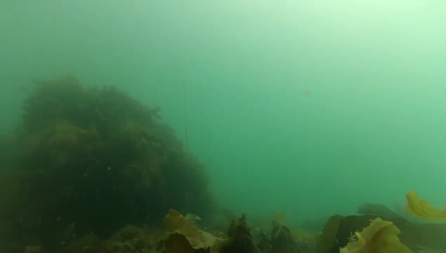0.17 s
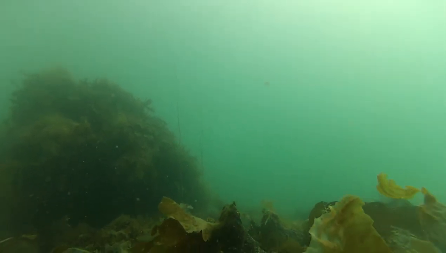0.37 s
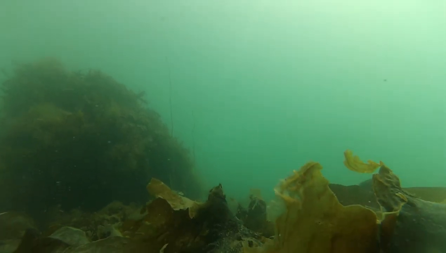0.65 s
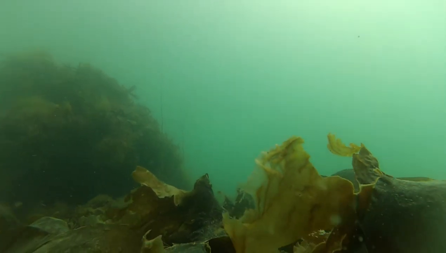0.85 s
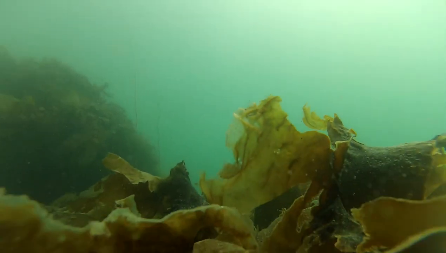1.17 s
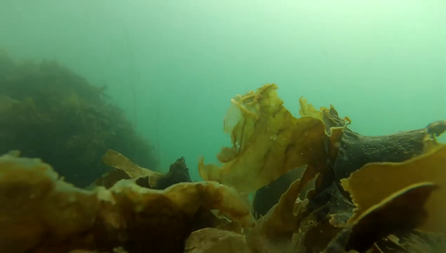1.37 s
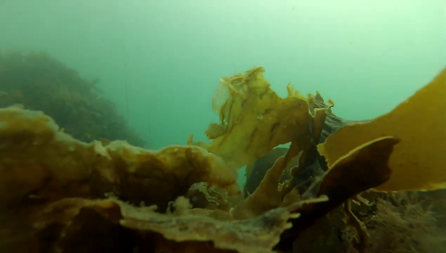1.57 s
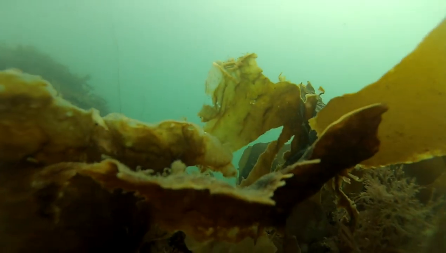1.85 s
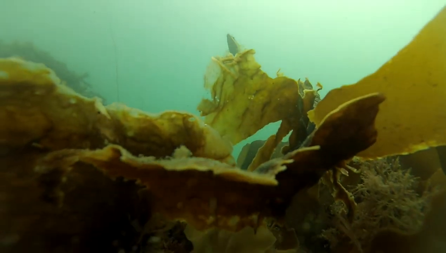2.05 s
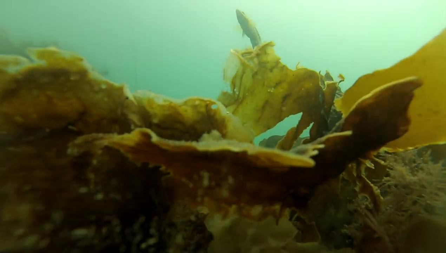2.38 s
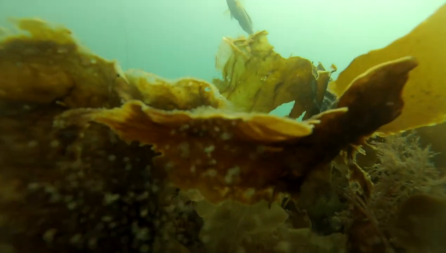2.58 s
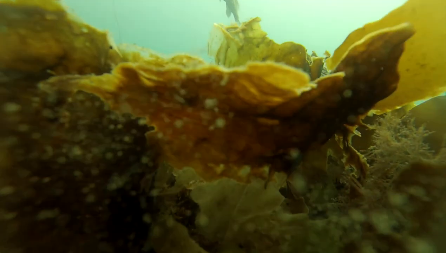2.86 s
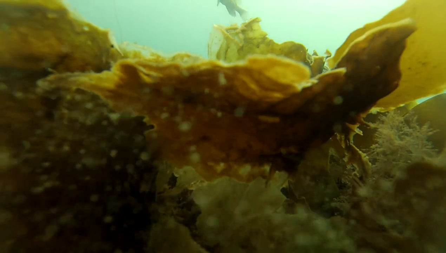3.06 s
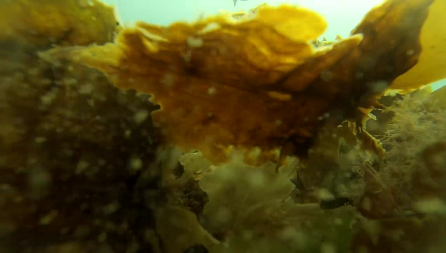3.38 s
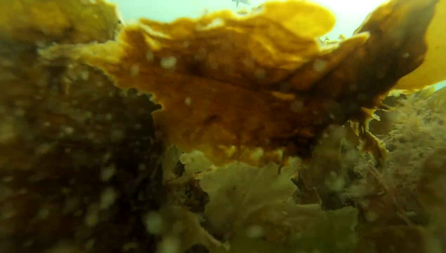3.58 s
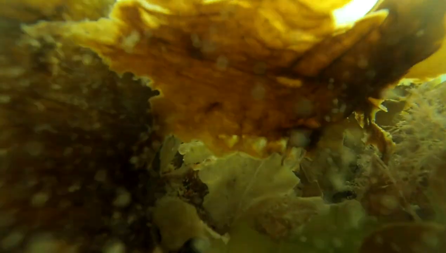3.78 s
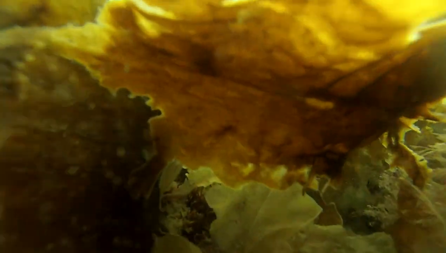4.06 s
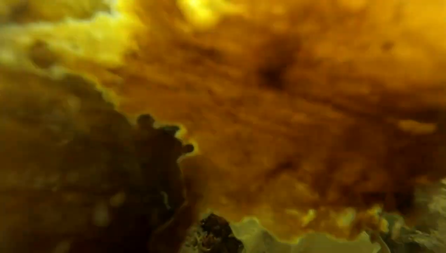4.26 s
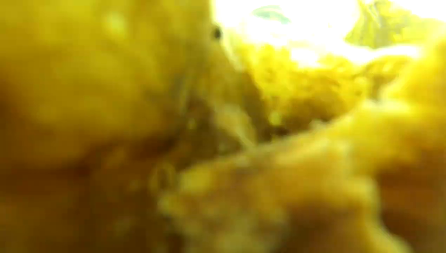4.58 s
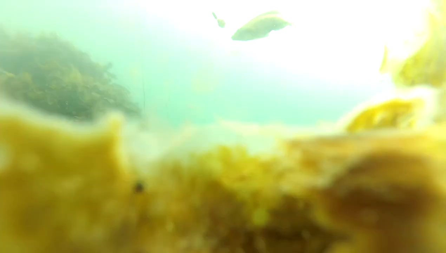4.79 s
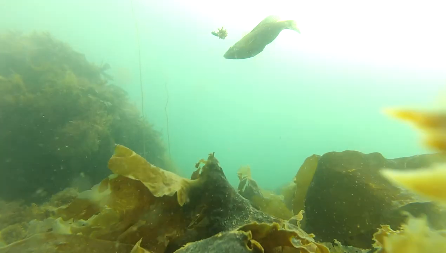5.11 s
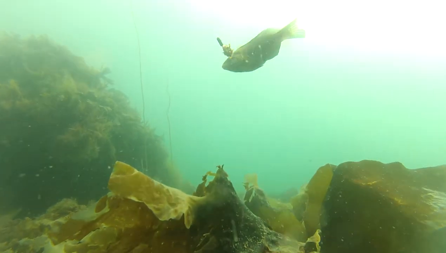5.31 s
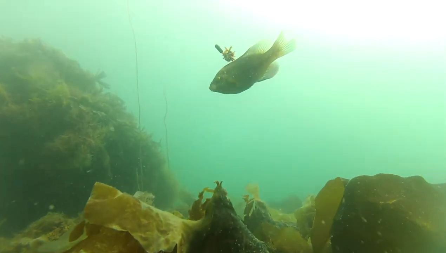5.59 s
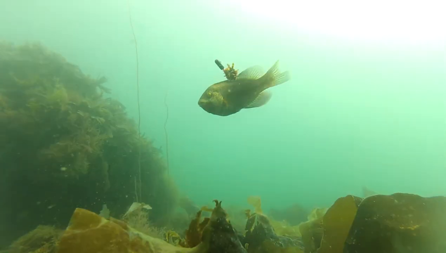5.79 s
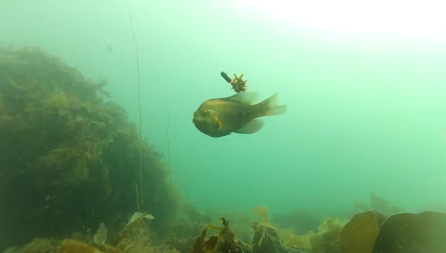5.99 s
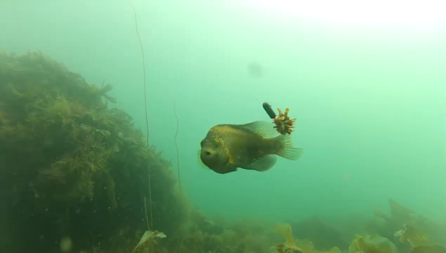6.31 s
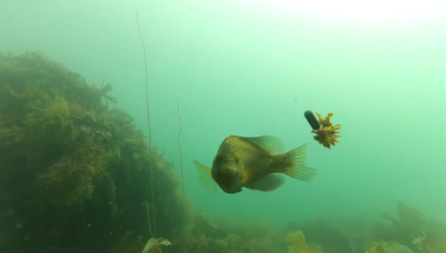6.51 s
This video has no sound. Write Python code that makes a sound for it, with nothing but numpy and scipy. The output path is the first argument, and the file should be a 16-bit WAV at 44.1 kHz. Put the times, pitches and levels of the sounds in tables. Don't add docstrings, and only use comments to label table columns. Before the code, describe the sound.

A microphone enclosed in a small submerged shell picks up boxy, muffled contact noise. Surging water makes the mount wobble and boom over soft hiss. Seaweed slides across with dull knocks and sparse ticks, then several strong thumps land close together. A pressed frond squeaks, rising slightly in pitch. Quick brushing sweeps and crisp snaps crowd the later part, then it settles until a final resonant tap.

```python
import sys
import numpy as np
from scipy import signal
from scipy.fft import rfft, irfft
from scipy.io import wavfile

SR = 44100
rng = np.random.default_rng(int(sys.argv[2]) if len(sys.argv) > 2 else 0)


def wav_out(sig):
    wavfile.write(sys.argv[1], SR, np.round(np.clip(np.atleast_2d(sig).T, -1, 1) * 32767).astype(np.int16))


def volts(x):
    e = np.asarray(x, float) / 20
    return 10 ** e


N = 293265

# frequency in Hz, level in dB per Hz.
WATER_COLOUR = [(88, -48), (150, -12), (252, -13.5), (312, -17.5), (536, -11.5), (702, -12.5), (937, -31.5),
                (1110, -13), (1330, -33), (1740, -17.5), (2760, -40), (3540, -36.5), (4470, -38),
                (10800, -40.5), (15000, -46.5)]
WATER_DB = -49
# frequency in Hz, level in dB.
WHINE_TONE = (11080, -92)

# time in seconds, level in dB.
SURGE_STRENGTH = [(0.0, -34), (0.16, -33), (0.3, -31), (0.6, -34), (1.05, -36), (1.3, -29), (1.6, -37),
                  (2.05, -39), (2.6, -38), (3.06, -42), (3.75, -42), (4.2, -31), (4.55, -33), (5.1, -45),
                  (5.25, -29), (5.87, -27), (6.06, -35), (6.65, -46)]
# start in seconds, length in seconds, push in dB, wobble in dB.
LURCHES = [(0, 0.18, -33, -25), (0.723, 0.098, -26.5, -43), (1.078, 0.11, -31, -36),
           (1.148, 0.44, -41, -28.5), (1.587, 0.47, -41, -37), (1.995, .15, -35.5, -32),
           (2.17, 0.2, -36.5, -36.5), (2.795, 0.29, -32, -48), (3.15, 0.45, -36.5, -38.5),
           (3.358, 0.25, -31.5, -32), (3.87, 0.088, -29.5, -47), (3.933, 0.11, -41, -40.5),
           (4.323, 0.16, -24, -44), (4.457, 0.21, -36, -35), (4.617, 0.15, -34, -32.5),
           (4.78, 0.15, -28.5, -50), (4.87, 0.19, -30.5, -58), (5.073, 0.088, -33, -50),
           (5.143, 0.36, -45, -39), (5.904, 0.27, -53, -49)]
WOBBLE_DB, WOBBLE_FOLLOWS, CALM_DB = -41.5, 0.16, -38

# time in seconds, pressure in dB, sliding speed in dB.
RESTING_KELP = [(0, -47.5, -56), (.28, -54.5, -61.5), (.53, -55, -57.5), (.75, -47.5, -57),
                (1.13, -48.5, -55.5), (1.39, -52, -58.5), (1.89, -53, -58), (2.43, -56.5, -57.5),
                (2.87, -49.5, -56), (3.07, -59, -58), (3.37, -51.5, -56.5), (3.7, -51, -57.5),
                (4.4, -42.5, -54), (4.72, -55.5, -55), (4.95, -60.5, -55.5), (5.6, -50.5, -55.5),
                (6.1, -60, -61.5), (6.65, -59.5, -61.5)]
# start in seconds, length in seconds, friction in dB,
# weight in dB, brightness in dB.
SWEEPS = [(0.896, 0.58, -61.5, 14.5, -4), (1.06, 0.11, -56.5, 16, -8), (1.403, 0.34, -50, 3.5, 0),
          (2.058, 0.34, -49, -0.5, -5), (3.418, 0.062, -40, 8.5, -6), (3.78, 0.44, -47.5, -4.5, 0),
          (3.872, 0.47, -43, -26, 8.5), (4.124, 0.14, -47.5, -5, 15.5), (4.246, 0.18, -39.5, -3, -8),
          (4.542, 0.035, -45.5, -3, 5), (4.636, 0.051, -42.5, -1, 1), (4.742, 0.17, -46, 2.5, -0.5),
          (5.042, 0.16, -48, -6.5, 0), (5.226, 0.086, -37.5, -1, -1.5), (5.275, 0.21, -40.5, -4, -0.5),
          (5.391, 0.17, -39, 4, -5), (5.603, 0.033, -41.5, -12, 2.5), (5.628, .1, -63, 20.5, -3),
          (5.724, 0.04, -47, -7, 0), (5.805, 0.063, -33.5, -10, -3.5), (5.823, 0.2, -45, -2, -5),
          (6.151, 0.029, -55, 11.5, -7)]
# start in seconds, length in seconds, hiss in dB.
BRUSHES = [
    (0.918, 0.37, -64),
    (3.71, 0.13, -64),
    (4.3, .14, -65),
    (5.044, .16, -70),
    (5.204, 0.044, -53),
    (5.243, 0.083, -58),
    (5.325, 0.08, -55),
    (5.43, .025, -56),
    (5.467, .04, -56),
]
# start in seconds, length in seconds, level in dB.
WISPS = [
    (1.0, .25, -72),
    (4.0, 0.18, -66),
    (4.5, 0.37, -70),
    (5.03, 0.24, -67),
    (5.588, .04, -68),
]
# frequency in Hz, width in Hz, level in dB.
SHELL_DEEP = [(204, 86, -1), (278, 18.2, 2), (370, 75, -7)]
SHELL_LOW = [(525, 56, 3), (664, 97, 3), (830, 138, -2), (1246, 360, -7)]
SHELL_HIGH = [(1384, 240, 4.5), (1695, 314, 4), (2320, 420, 1), (3537, 280, 0), (3945, 310, -4.5)]
SHELL_TOP = [(5060, 680, 4.5), (6300, 770, 0.5), (6990, 550, 0.5)]
SHELL_AIR = [(8980, 1300, -4), (10400, 1400, -0.5), (12900, 2900, -6.5)]
DRAG_DB = 1.5
HISS_DB, HISS_FOLLOWS, SLOW_DB = -72.5, 2.44, -58
AIR_DB, AIR_FOLLOWS = -78.5, 0.78
RUSTLE_UNDER_DB, HISS_UNDER_DB = 9.5, 20
HISS_BRIGHT = 0.9
RISE, FALL = 0.28, 0.37

# start in seconds, length in seconds, frequency in Hz, level in dB.
RUBS = [(0.14, 0.083, 570, -40.5), (0.141, 0.047, 370, -37), (0.488, 0.17, 550, -51.5),
        (0.969, 0.094, 517, -43), (1.202, 0.13, 259, -39), (1.257, 0.087, 656, -48.5),
        (1.187, 0.088, 457, -44.5), (1.77, .05, 10700, -74), (2.167, 0.2, 363, -50), (3.45, 0.03, 700, -35),
        (3.482, .02, 600, -40), (3.507, .02, 700, -39), (3.522, .03, 700, -46), (3.625, .04, 600, -48),
        (4.68, 0.1, 5130, -63), (5.02, 0.12, 5400, -62.5), (5.06, 0.07, 1100, -58), (5.095, .03, 600, -48),
        (4.99, .03, 2100, -58), (1.24, .11, 540, -45), (1.28, .06, 400, -45), (1.21, .03, 2200, -60),
        (5.614, 0.038, 780, -41), (6.075, 0.055, 10800, -74), (3.725, 0.076, 5000, -68),
        (3.725, .07, 6250, -67), (4.386, .012, 6800, -64), (1.473, .06, 270, -42), (1.314, 0.044, 690, -54),
        (1.806, 0.032, 295, -37.5), (3.72, 0.1, 1050, -56.5), (3.964, 0.32, 2380, -57),
        (3.96, 0.3, 3800, -56), (4.12, .12, 3800, -57), (5.21, .035, 8300, -62), (5.25, .045, 8000, -64),
        (5.332, .05, 8800, -65.5), (0.0, 0.036, 285, -35.5), (2.05, 0.38, 1130, -58),
        (2.048, .3, 1670, -61), (5.812, 0.029, 8500, -63), (2.605, .045, 460, -45), (2.18, .04, 640, -47),
        (4.425, .04, 670, -42), (2.52, .12, 165, -44), (1.205, .035, 350, -41)]
# time in seconds, note in Hz, level in dB.
SQUEAK = [
    (3.86, 815, -45),
    (3.934, 807, -36.5),
    (3.952, 830, -42.5),
    (4.22, 859, -30.5),
    (4.248, 840, -61),
    (4.26, 850, -52),
]
# start in seconds, length in seconds, frequency in Hz, level in dB.
HUMS = [
    (6.185, .02, 660, -39),
    (6.172, .014, 620, -48),
]
# time in seconds, peak in dB, frequency in Hz, 60 dB decay in seconds.
PINGS = [(1.618, -31, 1200, .009), (1.618, -38, 2000, .006), (1.618, -45, 3200, .006),
         (2.89, -49, 3500, .01), (2.955, -48, 3500, .01), (3.4332, -30, 2000, .008),
         (3.4334, -33, 2600, .007), (3.4332, -34, 3200, .008), (3.4334, -42, 4300, .007),
         (3.434, -23, 720, .03), (3.478, -25, 720, .03), (3.468, -32, 2250, .012), (3.468, -34, 3400, .007),
         (3.468, -43, 4400, .006), (3.4775, -43, 2600, .008), (3.5037, -40, 2200, .01),
         (3.612, -40, 2200, .015), (3.6165, -31, 1000, .014), (3.6165, -40, 1700, .012),
         (3.7575, -36, 2250, .014), (3.758, -43, 2600, .01), (3.7575, -42, 2950, .014),
         (3.758, -48, 6600, .012), (3.8245, -47, 6500, .006), (3.8245, -52, 5200, .008),
         (5.071, -44, 1000, .02), (5.108, -43, 1150, .02), (6.155, -40, 1550, .015),
         (6.155, -42, 2300, .012), (6.1597, -19, 615, .028), (6.1612, -30, 1220, .024),
         (6.1596, -38, 1550, .011), (4.406, -29, 650, .03), (4.406, -30, 400, .03)]

# time in seconds, peak in dB, level of the top in dB.
TICKS = [(1.1062, -46, -54), (2.6383, -39, -60), (2.7851, -47, -70), (2.954, -47, -73), (3.433, -38, -76),
         (3.4678, -40, -70), (3.5034, -45, -73), (3.7577, -46, -66), (3.824, -54, -68), (4.3474, -37, -52),
         (4.391, -51, -68), (4.4074, -46, -58), (4.561, -38.5, -52), (4.645, -38, -60), (4.672, -39, -54),
         (4.764, -42.5, -68), (5.25, -44, -54), (5.439, -38, -49.5), (5.499, -44, -57), (5.6146, -45, -58),
         (5.7952, -43, -55), (5.8156, -50, -60), (5.8282, -32, -57), (5.837, -35, -63),
         (5.8687, -35.5, -59), (6.155, -44, -69), (6.1602, -47, -55)]
# frequency in Hz, width in Hz, level in dB.
TICK_LOW = [(2180, 380, 0), (3520, 810, -7.5), (4660, 910, -14.5)]
TICK_TOP = [(6500, 1900, 0.5), (10500, 4800, -13)]

# time in seconds, peak in dB, pitch in Hz,
# upper modes in dB.
DAMPED_TAPS = [(1.094, -22.5, 405, -29), (1.403, -27.5, 543, -21), (1.618, -33, 700, -20),
               (1.804, -30, 510, -27), (1.817, -22, 387, -37), (2.167, -33, 520, -10),
               (2.955, -26.5, 627, -30), (3.928, -22, 796, -26), (4.093, -16.5, 795, -19),
               (4.123, -26, 854, -26), (4.342, -36, 670, -20), (4.56, -20, 690, -21),
               (4.644, -26.5, 570, -12.5), (4.808, -28.5, 770, -12), (5.238, -18.5, 560, -19),
               (5.666, -23.5, 630, -27), (5.792, -24.5, 560, -15), (6.1596, -27, 330, -30),
               (6.16, -44, 3800, -25), (3.399, -38, 1040, -15), (3.4675, -24.5, 970, -10),
               (3.6125, -28, 1010, -16), (3.6185, -27, 405, -20), (4.3433, -29.5, 900, -17),
               (5.319, -28, 640, -20), (3.4605, -16, 676, -22), (1.618, -42, 1000, -20),
               (3.7, -38, 700, -12), (2.256, -30, 400, -25)]
# time in seconds, peak in dB, pitch in Hz, upper modes in dB.
BOUNCES = [(1.257, -31.5, 613, -26), (3.4, -33.5, 412, -6), (3.433, -14.5, 474, -21),
           (3.476, -17.5, 498, -17), (3.5053, -20, 410, -20), (3.612, -27.5, 508, -12),
           (4.163, -22.5, 860, -30), (4.388, -23, 418, -17), (4.839, -28.5, 420, -13.5),
           (5.282, -28, 816, -14), (5.35, -34, 630, -24), (5.378, -29.5, 620, -18), (5.422, -22, 558, -26),
           (5.443, -16, 630, -16.5), (5.472, -24, 650, -19), (5.613, -25.5, 577, -9.5),
           (5.694, -35, 624, -26), (5.821, -25, 397, -7)]
# frequency in Hz, level in dB, 60 dB decay in seconds.
TAP_UPPER = [(1120, 4, 0.0079), (1484, -6, 0.026), (2056, -8.5, 0.022)]
TAP_T60_S, BOUNCE_T60_S = 0.013, 0.039

# time in seconds, strength in dB, pitch in Hz, cycles to die.
BLOWS = [(0.089, -14, 80, 4.3), (0.128, -13, 98, 2.2), (0.178, -9.5, 95, 2.3), (1.396, -23, 110, 2),
         (6.162, -22, 85, 2.5), (1.2265, -19, 210, 2), (1.272, -19, 190, 2), (1.249, -22, 170, 2),
         (4.222, -21, 250, 3), (4.269, -22, 250, 3), (1.208, -12.5, 99, 1.6), (1.307, -14, 108, 1.1),
         (1.383, -16, 103, 4.9), (2.174, -7.5, 60, 1.15), (2.242, -13, 195, 0.65), (2.391, -22.5, 207, 2.4),
         (3.401, -22, 250, 14), (3.434, -1.5, 184, 3.2), (3.46, -7, 200, 3.9), (3.478, 0, 227, 2.2),
         (3.505, -6, 258, 2), (3.6135, -6, 253, 0.89), (3.615, -20, 200, 3), (2.187, -24, 125, 8),
         (3.856, -22.5, 129, 6.9), (4.293, -17, 149, 2.5), (4.3205, -10, 125, 3.5), (4.84, -14, 150, 1.3),
         (5.2092, -10.5, 62, 2.4), (5.24, -14.5, 42, 5.9), (5.33, -22, 118, 2.8), (5.524, -14, 62, 1.3),
         (5.616, -8.5, 134, 2.26), (5.665, -14.5, 188, 4.3), (5.701, -33, 98, 1.6)]
# time in seconds, strength in dB, pitch in Hz.
ROCKS = [(0.051, -12, 62), (0.214, -11.5, 56), (0.236, -21, 50), (0.257, -21, 58), (0.294, -15.5, 58),
         (0.345, -22, 58), (0.385, -22, 60), (2.485, -23, 48), (4.84, -14, 52), (5.494, -15.5, 42),
         (5.621, -13.5, 52), (1.121, -16, 53), (4.641, -17.5, 33.2), (4.673, -14, 33.6), (4.763, -17.5, 51),
         (5.289, -11.5, 48), (5.393, -16, 46), (5.657, -14.5, 48.4), (5.813, -15.5, 35.6),
         (5.865, -12.5, 36.3)]
# time in seconds, strength in dB, pitch in Hz.
JOLTS = [(-0.0105, -8, 52), (0.0147, -11.5, 120), (0.031, -14, 52), (0.0405, -18, 120), (0.108, -16, 50),
         (1.106, -21, 108), (1.513, -21, 117), (1.8295, -24, 113), (1.8385, -17, 113), (2.258, -26, 118),
         (2.398, -23, 112), (2.775, -24, 120), (2.907, -21.5, 115), (4.343, -5, 118), (4.425, -14.5, 103.5),
         (4.502, -19.5, 115), (4.947, -20, 48)]
ROCK_CYCLES, JOLT_CYCLES = 4.9, 12.5


def rms_one(x):
    return x / np.sqrt(np.mean(x ** 2) + 1e-20)


def column(rows, k):
    return np.transpose(rows)[k]


def in_time(rows):
    s, *columns = np.transpose(rows)
    return [np.interp(np.arange(N) / SR, s, c) for c in columns]


def add(out, s, wave):
    i = round(s * SR)
    wave = wave[max(-i, 0):N - i]
    out[max(i, 0):max(i, 0) + len(wave)] += wave


def drift(rate):
    r = np.exp(-80 * np.pi * rate / SR)
    noise = rng.standard_normal(N // 40 + 2002)
    slow = signal.lfilter([1], [1, -2 * r, r * r], noise)[2000:]
    return np.interp(np.arange(N) / 40, np.arange(len(slow)), rms_one(slow))


def grains(per_s, spread_db, clump_db):
    sizes = volts(spread_db * np.minimum(rng.exponential(1, N), 5)) * rng.choice([-1, 1], N)
    born = rng.random(N) < per_s * volts(clump_db * drift(18)) / SR
    return rms_one(sizes * born + 1e-9)


def resonances(x, modes):
    out = 0
    for k, (hz, width_hz, db) in enumerate(modes):
        r = np.exp(-np.pi * width_hz / SR)
        poles = [1, -2 * r * np.cos(2 * np.pi * hz / SR), r * r]
        ringing = signal.lfilter([(1 - r * r) / 2, 0, (r * r - 1) / 2], poles, x)
        out = out + (-1) ** k * volts(db) * ringing
    return out


def band(x, low_hz, high_hz):
    return rms_one(signal.sosfilt(signal.butter(3, [low_hz, high_hz], "band", fs=SR, output="sos"), x))


def swells(rows, levels_db, under_db):
    power = volts(2 * under_db)
    for (s, length, *_), db in zip(rows, levels_db):
        u = np.arange(round(length * SR)) / (length * SR)
        shape = np.clip(np.minimum(u / RISE, (1 - u) / FALL), 0, 1)
        add(power, s, volts(2 * db) * shape ** 2)
    return 10 * np.log10(power)


def water():
    hz = np.maximum(np.arange(N // 2 + 1) * SR / N, 1)
    point_hz, point_db = np.transpose(WATER_COLOUR)
    colour = volts(np.interp(np.log(hz), np.log(point_hz), point_db))
    wash = rms_one(irfft(rfft(rng.standard_normal(N)) * colour, N))
    return volts(WATER_DB - 7 + 0.96 * drift(10.0)) * wash


def whine():
    hz, db = WHINE_TONE
    return volts(db + 3 * drift(3)) * np.sin(2 * np.pi * np.cumsum(hz + 15 * drift(30)) / SR)


def surge():
    surge_db, = in_time(SURGE_STRENGTH)
    calm_wobble_db = WOBBLE_DB + WOBBLE_FOLLOWS * (surge_db - CALM_DB)
    push_db = swells(LURCHES, column(LURCHES, 2), surge_db)
    wobble_db = swells(LURCHES, column(LURCHES, 3), calm_wobble_db)
    low = signal.butter(2, [20, 66], "band", fs=SR, output="sos")
    shoves = grains(per_s=290, spread_db=-5.5, clump_db=2.5)
    push = rms_one(signal.sosfilt(low, np.r_[shoves[-SR:], shoves])[SR:])
    mount = [(92.6, 34.0, -0.5), (127.3, 18.7, 1.0), (170.0, 22, -14.5)]  # Hz, width Hz, dB
    wobble = resonances(grains(per_s=120, spread_db=3.0, clump_db=4.0), mount)
    wobble = rms_one(resonances(wobble, [(113.5, 87, 0)]))
    return volts(push_db - 0.5) * push + volts(wobble_db - 3.0) * wobble


def slide():
    pressure_db, speed_db = in_time(RESTING_KELP)
    sweep_db, weight_db, bright_db = (column(SWEEPS, k) for k in (2, 3, 4))
    drag_db = swells(SWEEPS, sweep_db + weight_db, pressure_db + DRAG_DB)
    friction_db = swells(SWEEPS, sweep_db, pressure_db)
    rustle_db = swells(SWEEPS, sweep_db + bright_db - RUSTLE_UNDER_DB, speed_db)
    sweep_hiss_db = sweep_db + HISS_BRIGHT * bright_db - HISS_UNDER_DB
    hiss_db = swells(SWEEPS, sweep_hiss_db, HISS_DB + HISS_FOLLOWS * (speed_db - SLOW_DB))
    air_db = swells(WISPS, column(WISPS, 2), AIR_DB + AIR_FOLLOWS * (hiss_db - HISS_DB))
    hiss_db = swells(BRUSHES, column(BRUSHES, 2), hiss_db)

    slips = grains(per_s=810, spread_db=1.0, clump_db=4.5)
    drag = 1.26 * slips + grains(per_s=240, spread_db=3.5, clump_db=3.5)
    rustle = 0.38 * slips + grains(per_s=5000, spread_db=1.0, clump_db=2.5)
    hiss = 0.72 * rustle + grains(per_s=10000, spread_db=4.0, clump_db=2.5)
    return (volts(drag_db + 1.5) * band(resonances(drag, SHELL_DEEP), 137, 520)
            + volts(friction_db - 1.0) * band(resonances(slips, SHELL_LOW), 406, 1096)
            + volts(rustle_db - 3.5) * band(resonances(rustle, SHELL_HIGH), 1170, 4950)
            + volts(hiss_db - 4.5) * band(resonances(hiss, SHELL_TOP), 3900, 8400)
            + volts(air_db - 6.5) * band(resonances(hiss, SHELL_AIR), 7800, 15000))


def rubs():
    out, slips = np.zeros(N), grains(per_s=2800, spread_db=2.0, clump_db=6.5)
    for s, length, hz, db in RUBS:
        n = round(length * SR)
        mode = [(hz, 30 + 0.12 * hz, 0)]
        caught = resonances(resonances(slips[round(s * SR):][:n], mode), mode)
        add(out, s, volts(db) * np.hanning(n) ** 0.5 * rms_one(caught))
    return out


def squeak():
    note_hz, db = in_time(SQUEAK)
    t = np.arange(N) / SR
    start, end = SQUEAK[0][0], SQUEAK[-1][0]
    pressed = np.clip(np.minimum((t - start) / 0.059, (end - t) / 0.02), 0, 1)
    turn = np.exp(2j * np.pi * np.cumsum(note_hz) / SR)
    r = np.exp(-np.pi * 60 / SR)
    slips = grains(per_s=600, spread_db=3.5, clump_db=1.5) / turn
    note = signal.lfilter([1], [1, -r], signal.lfilter([1], [1, -r ** 3], slips))
    return pressed * volts(db - 2.5) * rms_one(np.real(turn * note))


def hums():
    out = np.zeros(N)
    for s, length, hz, db in HUMS:
        n = round(length * SR)
        add(out, s, volts(db) * np.hanning(n) * np.sin(2 * np.pi * hz * np.arange(n) / SR))
    return out


def pings():
    out, t = np.zeros(N), np.arange(SR // 20) / SR
    for s, db, hz, t60 in PINGS:
        fading = volts(db - 60 * t / max(t60, 0.003))
        onset = 1 - np.exp(-t / 0.0003)
        add(out, s, fading * onset * np.sin(2 * np.pi * hz * t))
    return out


def ticks():
    low, top, t = np.full(N, 1e-18), np.full(N, 1e-18), np.arange(SR // 50) / SR
    for s, db, top_db in TICKS:
        add(low, s, volts(db - 60 * t / 0.015) * rng.standard_normal(len(t)))
        add(top, s, volts(top_db - 60 * t / 0.008) * rng.standard_normal(len(t)))
    dull = signal.butter(6, 5400, fs=SR, output="sos")
    thin = signal.butter(2, 3500, "high", fs=SR, output="sos")
    low = signal.sosfilt(dull, resonances(low, TICK_LOW))
    top = signal.sosfilt(thin, resonances(top, TICK_TOP))
    return volts(10.0) * low + volts(13.0) * top


def taps():
    out, t = np.zeros(N), np.arange(SR // 10) / SR
    hits = [(*row, TAP_T60_S) for row in DAMPED_TAPS] + [(*row, BOUNCE_T60_S) for row in BOUNCES]
    onset = 1 - np.exp(-t / 0.00071)
    for s, db, hz, upper_db, t60 in hits:
        wave = volts(-60 * t / t60) * np.sin(2 * np.pi * hz * t)
        for mode_hz, mode_db, mode_t60 in TAP_UPPER:
            level_db = upper_db + mode_db + rng.normal(0, 0.73) + 3
            wave = wave + volts(level_db - 60 * t / mode_t60) * np.sin(2 * np.pi * mode_hz * t)
        add(out, s, volts(db) * wave * onset)
    return out


def thuds():
    out, t = np.zeros(N), np.arange(SR // 5) / SR
    rocks = [(*row, ROCK_CYCLES) for row in ROCKS]
    jolts = [(*row, JOLT_CYCLES) for row in JOLTS]
    sag_s = 0.035 * 0.0014 * (1 - np.exp(-t / 0.0034))
    for s, db, hz, cycles in BLOWS + rocks + jolts:
        fading = volts(db - 60 * t * hz / cycles)
        onset = 1 - np.exp(-t * hz / 0.12)
        add(out, s, -fading * onset * np.sin(2 * np.pi * hz * (t + sag_s)))
    return out


def scene():
    background = water() + whine() + surge()
    friction = slide() + rubs() + squeak()
    knocks = hums() + pings() + ticks() + taps() + thuds()
    return (background + friction + knocks)[None]


def low_pass(x):
    return signal.sosfilt(signal.butter(12, 15200, fs=SR, output="sos"), x)


def record(dry):
    bass_cut = signal.butter(2, 14, "high", fs=SR, output="sos")
    return low_pass(signal.sosfilt(bass_cut, dry))


dry = scene()
out = record(dry)
wav_out(out)
```